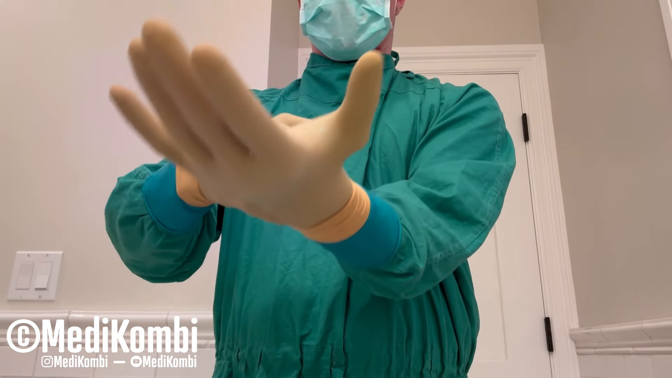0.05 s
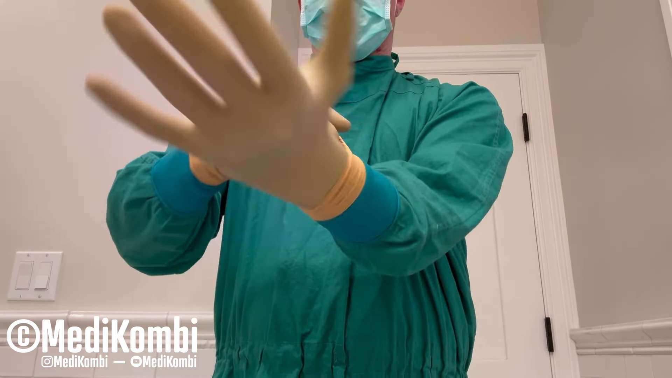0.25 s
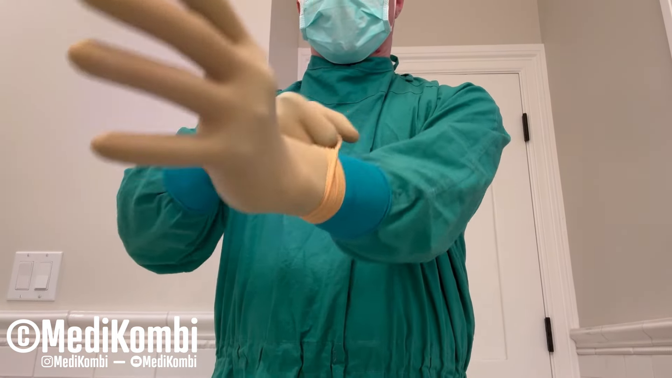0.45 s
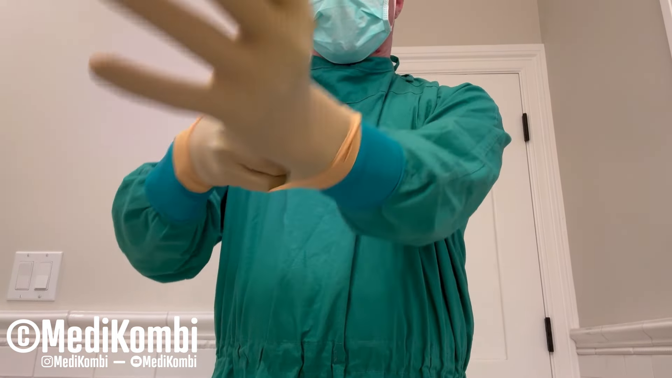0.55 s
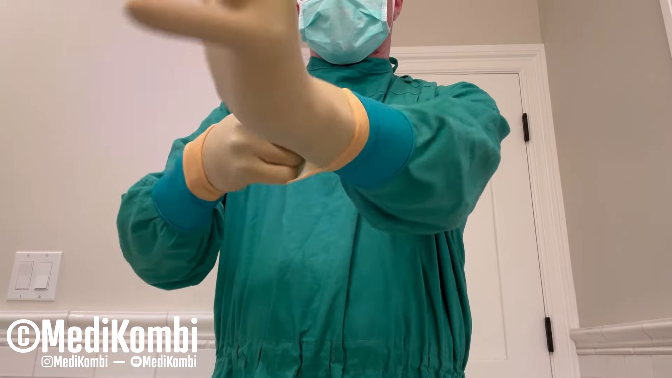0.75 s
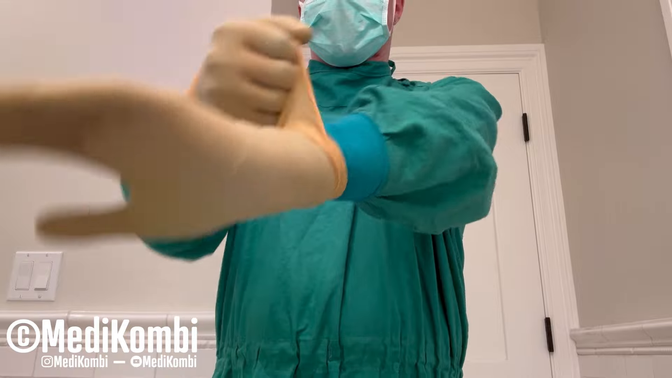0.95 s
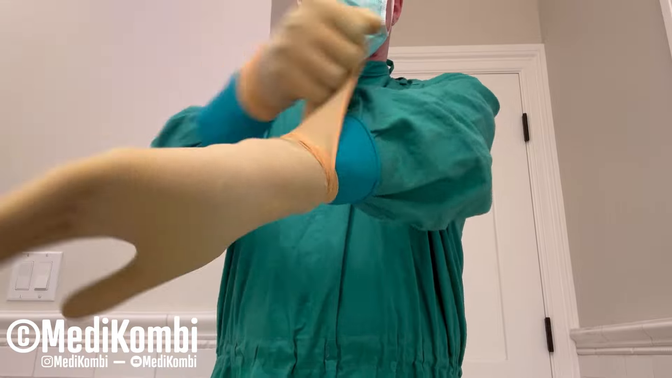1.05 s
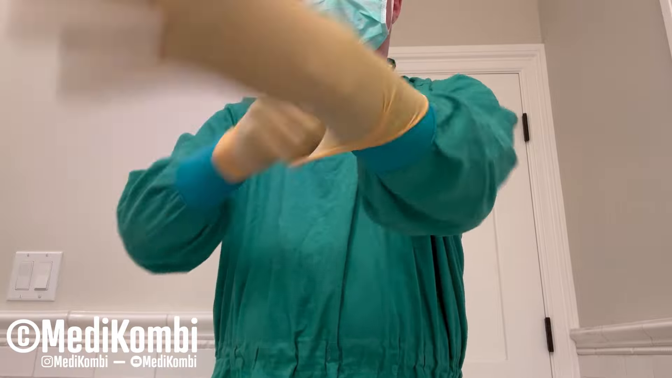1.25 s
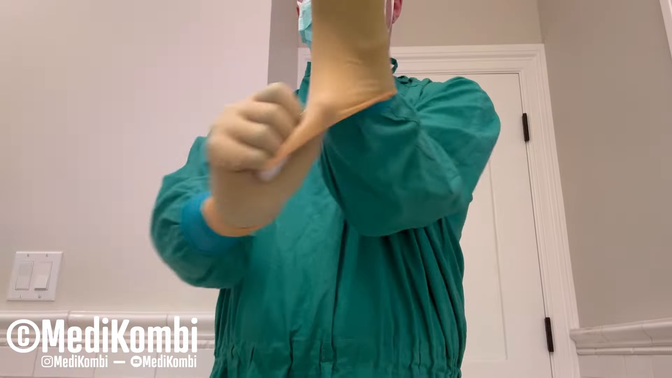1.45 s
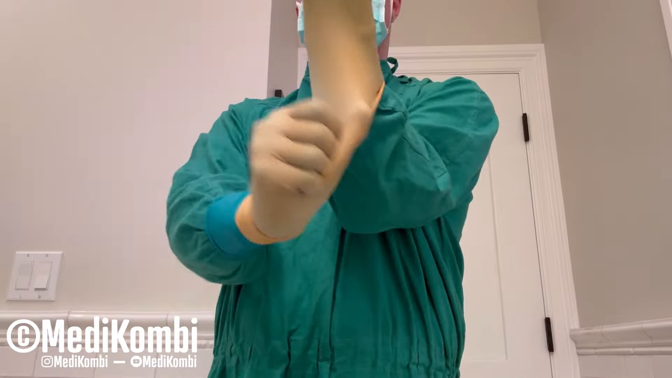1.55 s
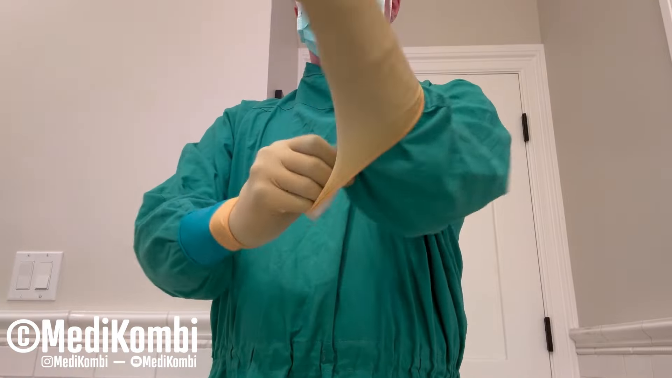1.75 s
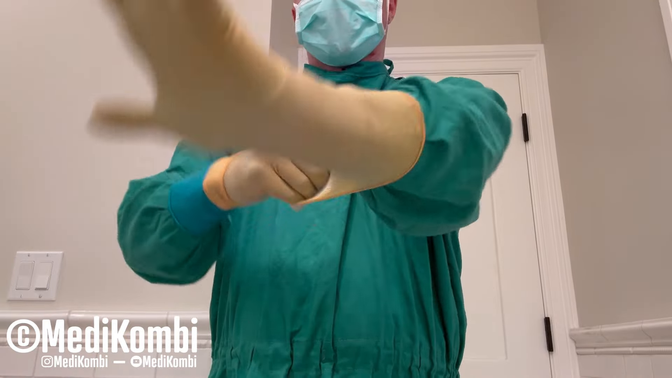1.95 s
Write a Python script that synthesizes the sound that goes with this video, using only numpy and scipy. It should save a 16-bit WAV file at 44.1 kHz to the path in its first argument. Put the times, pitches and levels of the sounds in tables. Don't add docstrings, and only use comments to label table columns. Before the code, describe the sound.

Thick rubber gloves tugged close to the microphone in a small hard room: sharp snaps, a loud ringing cuff slap early, quieter crinkles and rubbing, then wobbly pops and a tight burst of bright snaps, fading to faint ticks.

```python
import sys
import numpy as np
from scipy import signal
from scipy.fft import rfft, irfft
from scipy.io import wavfile
from scipy.ndimage import uniform_filter1d, minimum_filter1d

SR = 44100
rng = np.random.default_rng(int(sys.argv[2]) if len(sys.argv) > 2 else 0)


def waveform_to_disk(signal):
    frames = np.transpose(np.atleast_2d(signal))
    scaled = np.clip(frames, -1, 1) * 32767
    samples = np.round(scaled).astype(np.int16)
    wavfile.write(sys.argv[1], SR, samples)


def elevation(decibels):
    levels = np.asarray(decibels, float)
    return 10 ** (levels / 20)


N = 88200


def read(table, x, log=False):
    a = np.array(table, float)
    if log:
        return np.interp(np.log(x + 1), np.log(a[:, 0] + 1), a[:, 1])
    return np.interp(x, a[:, 0], a[:, 1])


def unit(x):
    return x / np.sqrt(np.mean(x ** 2))


def peak(x, db):
    return x * elevation(db) / abs(x).max()


def freqs(x):
    return np.fft.rfftfreq(x.shape[-1], 1 / SR)


def colour(x, table):
    return irfft(rfft(x) * elevation(read(table, freqs(x), log=True)), x.shape[-1])


def band(x, hz, width_hz):
    return irfft(rfft(x) * np.exp(-2 * ((freqs(x) - hz) / width_hz) ** 2), x.shape[-1])


def walk(rate_per_s):
    k = int(SR / rate_per_s)
    return unit(uniform_filter1d(uniform_filter1d(rng.standard_normal(N), k), k))


def add(out, x, at_s):
    i = int(at_s * SR) - len(x) // 2 + np.arange(len(x))
    keep = (i >= 0) & (i < N)
    out[i[keep]] += x[keep]


BURST_MS = np.arange(-1024, 1024) / SR * 1000
EVENNESS = 0.85


def burst(ms):
    envelope = np.exp(-np.where(BURST_MS < 0, 2.5, 1.2) * abs(BURST_MS) / ms)
    spec = rfft(rng.standard_normal(len(BURST_MS)) * envelope)
    return irfft(spec / abs(spec) ** EVENNESS) * np.exp(-(BURST_MS / (5 * ms)) ** 2)


def wobble(hz, cycles, turn, size=4096):
    t = np.arange(-size, size) / SR * hz
    envelope = np.exp(-np.where(t < 0, 9., 3.) * (t / cycles) ** 2)
    return envelope * np.cos(2 * np.pi * (t + turn))


CRACK_HZ, CRACK_WIDTH_HZ, CRACK_OCTAVES_PER_DB = 5150, 4820, 0.035
BODY_HZ, BODY_WIDTH_HZ = 1400, 1300
AIR_HZ, AIR_WIDTH_HZ = 13000, 4300


def snap_voice(x, db, body_db, air_db):
    crack_hz = CRACK_HZ * 2 ** (CRACK_OCTAVES_PER_DB * air_db)
    crack = peak(band(x, crack_hz, CRACK_WIDTH_HZ), db)
    body = peak(band(x, BODY_HZ, BODY_WIDTH_HZ), db + body_db)
    air = peak(band(x, AIR_HZ, AIR_WIDTH_HZ), db + air_db)
    return crack + body + air


SNAP_MS, SNAP_LAG_S, SNAP_ROOM_TOP_DB = 0.38, 0.0011, -8
PEEL_MS, PEEL_DB = 1.4, -17
# start_s, peak_db, body_db, air_db, room_db (last three relative)
SNAP_EVENTS = [(0.0024, -31.5, -12.5, 3, -7.5), (0.164, -32, -15, 0.5, -8), (0.1896, -26, -8.5, 2, -7),
               (0.4985, -43, -3, -13, 3), (0.5274, -39.5, -10, -14, 4), (0.5943, -44, -10, 0, -10),
               (0.7516, -51, -29, 1, -19), (0.783, -48, -29, -2, -45), (0.823, -46.5, -24, -8.5, -12),
               (0.986, -48, -26, 10, -9), (0.8715, -33.5, -22, -5, 10), (0.8961, -32, -20, -10, -3),
               (0.9225, -34, -31, 6.5, -14), (1.0031, -32, -7.5, 6, -6.5), (1.2001, -31.5, -6.5, 5, -2),
               (1.2945, -18.5, -44, 4, -16), (1.317, -13.5, -48, -3.5, -14.5), (1.3265, -33, -15, -7, -26),
               (1.3445, -19, -52, 0.5, -19), (1.3957, -17, -21, 2.5, -18), (1.551, -47, -3, 5, -18),
               (1.664, -37.5, -6, -1.5, -8), (1.698, -39, -3, -8, 0), (1.8659, -50.5, -7, 6.5, -6),
               (1.901, -51, -16, 19.5, -18), (1.9384, -50.5, 2, 3, -6), (1.9599, -52, -5, -8, -16)]


def snaps():
    dry, wet = np.zeros(N), np.zeros(N)
    for start_s, db, body_db, air_db, room_db in SNAP_EVENTS:
        click = peak(burst(SNAP_MS), 0)
        decay = np.exp(-abs(BURST_MS) / PEEL_MS) * (BURST_MS > 0)
        peel = elevation(PEEL_DB) * rng.standard_normal(len(BURST_MS)) * decay
        at_s = start_s + SNAP_LAG_S
        add(dry, snap_voice(click + peel, db, body_db, air_db), at_s)
        send = elevation(min(room_db, SNAP_ROOM_TOP_DB))
        add(wet, snap_voice(click, db, body_db, air_db) * send, at_s)
    return dry, wet


SLAP_S, SLAP_DB, SLAP_MS = 0.2226, -6.5, 1.06
SLAP_DIP_HZ, SLAP_DIP_WIDTH_HZ, SLAP_DIP = 3850, 450, 0.6
SLAP_BODY_DB, SLAP_BODY_HZ, SLAP_BODY_CYCLES, SLAP_BODY_LAG_S = -25, 926, 1.98, 0.0008
SLAP_ECHO_S, SLAP_ECHO_DB = 0.0037, -7
# freq_hz, gain_db
SLAP_SPECTRUM = [(300, -39), (720, -4.5), (1350, -5), (2600, -16.5), (3100, -3), (4400, 3), (6000, -9.5),
                 (16000, -16.5)]


def slap():
    out = np.zeros(N)
    flat = irfft(np.exp(1j * np.angle(rfft(burst(SLAP_MS)))))
    crack = colour(flat, SLAP_SPECTRUM)
    crack = crack - SLAP_DIP * band(crack, SLAP_DIP_HZ, SLAP_DIP_WIDTH_HZ)
    add(out, peak(crack * np.hanning(len(crack)) ** 4, SLAP_DB), SLAP_S)
    echo = elevation(SLAP_ECHO_DB) * np.roll(out, int(SLAP_ECHO_S * SR))
    body = elevation(SLAP_BODY_DB) * wobble(SLAP_BODY_HZ, SLAP_BODY_CYCLES, 0.22)
    add(out, body, SLAP_S + SLAP_BODY_LAG_S)
    return out, echo


REBOUND_S, REBOUND_DB, REBOUND_OCTAVES = 0.02, -13, 0.4
# start_s, peak_db, pitch_hz, length_cycles
CUFF_POPS = [(0.098, -46, 1330, 1.6), (0.528, -41, 465, 2.2), (0.546, -55, 430, 7.1),
             (0.587, -57, 554, 1.3), (0.638, -52.5, 468, 6.2), (0.904, -49, 432, 6.6),
             (0.948, -55.5, 404, 7.9), (1.014, -47, 575, 2.8), (1.048, -63, 146, 0.86),
             (1.121, -52.5, 547, 7.3), (1.14, -40.5, 438, 4.5), (1.1776, -30, 414, 2.1),
             (1.2, -33.5, 483, 2.06), (1.275, -41.5, 184, 3.8), (1.311, -42, 203, 3.8),
             (1.342, -42, 410, 4.5), (1.378, -44, 306, 9.4), (1.399, -33.5, 326, 2.13),
             (1.547, -39.5, 1170, 1.4), (1.579, -55, 307, 5.5), (1.661, -40.5, 660, 3.4),
             (1.744, -48, 1230, 7.3), (1.937, -48, 1440, 2.1)]
# start_s, peak_db, pitch_hz, length_cycles
SLEEVE_THUMPS = [
    (0.879, -59, 73, 2.2),
    (0.953, -61, 100.4, 2.4),
    (1.049, -49.5, 150, 1.05),
    (1.271, -42.5, 70, 2.15),
    (1.331, -56, 71.6, 2.4),
    (1.39, -44, 125, 1.3),
    (1.674, -55, 119, 2),
]
# start_s, peak_db, pitch_hz, length_cycles
MORE_CUFF_POPS = [(0.227, -46, 423, 12.4), (0.428, -58, 520, 9.1), (.544, -42, 1030, 2),
                  (.56, -45, 823, 1.8), (.598, -48, 670, 3.2), (1.136, -38.5, 1060, 1.9),
                  (1.135, -42, 1800, 4.9), (1.174, -36, 427, 1.8), (1.182, -35.5, 283, 2.3),
                  (1.192, -36, 407, 0.91), (1.207, -41, 560, 4.7), (1.225, -44.5, 505, 7.4),
                  (1.242, -48, 474, 3.5), (1.41, -43.5, 356, 2.9), (1.437, -66, 298, 1.1),
                  (1.661, -42, 1310, 4), (1.698, -40.5, 2020, 5), (1.699, -45, 990, 1.2),
                  (1.712, -38, 1520, 1.8)]


def pops():
    out = np.zeros(N)
    rows = CUFF_POPS + SLEEVE_THUMPS + MORE_CUFF_POPS
    for (start_s, db, hz, cycles), chance in zip(rows, rng.random((len(rows), 10))):
        cycles = max(cycles, 0.8)
        add(out, elevation(db) * wobble(hz, cycles, chance[0]), start_s + 0.003784)
        for late, pitch, turn in chance[1:].reshape(3, 3):
            other_hz = hz * 2 ** (REBOUND_OCTAVES * (2 * pitch - 1))
            rebound = elevation(db + REBOUND_DB) * wobble(other_hz, cycles, turn)
            add(out, rebound, start_s + 0.00401 + (late - 0.3) * REBOUND_S)
    return out


SLIDE_PER_S, SLIDE_SCATTER_DB, SLIP_CAP = 6000, 3, 3.5
SLIDE_DB, SLIDE_FLICKER_DB, SLIDE_FLICKER_PER_S = -2.5, 2.5, 29.3
# time_s, level_db
SLIDE_LEVEL = [(0, -59.5), (.08, -66), (.16, -64), (.3, -55), (.46, -65.5), (.56, -58), (.7, -82.5),
               (.83, -62), (.89, -55.5), (1.05, -57.5), (1.15, -48.5), (1.27, -59.5), (1.33, -45.5),
               (1.45, -64.5), (1.62, -65), (1.7, -51.5), (1.85, -72.5), (2, -61)]
# freq_hz, gain_db
SLIDE_SPECTRUM = [(200, -25.5), (900, 1), (2500, 5), (4500, 2.5), (7000, 0.5), (10000, 1), (13000, 5),
                  (16000, -10)]


def slide():
    slip_now = rng.random(N) < SLIDE_PER_S / SR
    size = np.minimum(rng.exponential(size=N), SLIP_CAP)
    slips = slip_now * rng.standard_normal(N) * elevation(SLIDE_SCATTER_DB * size)
    flicker_db = SLIDE_FLICKER_DB * walk(SLIDE_FLICKER_PER_S)
    level_db = read(SLIDE_LEVEL, np.arange(N) / SR) + SLIDE_DB + flicker_db
    return unit(colour(slips, SLIDE_SPECTRUM)) * elevation(level_db)


CRINKLE_PER_S, CRINKLE_SCATTER_DB, CRINKLE_DB = 800, 2, -8.5
CRINKLE_HZ, CRINKLE_OCTAVES, CRINKLE_CYCLES = 560, 0.94, 1.44
CRINKLE_TILT_DB = 5
# time_s, level_db
CRINKLE_LEVEL = [(0, -64), (.15, -62.5), (.35, -55), (.47, -56), (.56, -46), (.66, -73), (.72, -99),
                 (.83, -69), (.9, -49.5), (1.02, -62.5), (1.1, -55), (1.21, -43.5), (1.3, -51),
                 (1.42, -43.5), (1.6, -58), (1.7, -50.5), (1.8, -73.5), (2, -71.5)]


def crinkle():
    count = 1800
    out, chance = np.zeros(N), rng.random((count, 3))
    octaves = rng.standard_normal(count) * CRINKLE_OCTAVES
    times_s = np.cumsum(-np.log(chance[:, 0])) / CRINKLE_PER_S
    for at_s, (_, size, turn), octave in zip(times_s[times_s < N / SR], chance, octaves):
        db = CRINKLE_TILT_DB * octave - CRINKLE_SCATTER_DB * np.log(size)
        add(out, elevation(db) * wobble(CRINKLE_HZ * 2 ** octave, CRINKLE_CYCLES, turn, size=1024), at_s)
    return unit(out) * elevation(read(CRINKLE_LEVEL, np.arange(N) / SR) + CRINKLE_DB)


PAN_DB = -4.5


def ports(x, lead_ms):
    lead = np.exp(2j * np.pi * freqs(x) * lead_ms / 1000)
    right = irfft(rfft(x) * lead, N)
    return np.array([x * elevation(PAN_DB / 2), right * elevation(-PAN_DB / 2)])


ROOM_GAP_MS, ROOM_FILL_MS = 0.85, 6
# freq_hz, t60_s
ROOM_DECAY = [(150, 0.4), (500, 0.48), (1000, 0.46), (2000, 0.26), (4000, 0.54), (9000, 0.36),
              (15000, 0.24)]


def room(x):
    t = np.arange(SR) / SR
    noise = rng.standard_normal((2, SR))
    tail = np.zeros((2, SR))
    for hz in 60 * 2 ** np.arange(0, 8.3, 1 / 3):
        t60_s = read(ROOM_DECAY, hz, log=True)
        tail += band(noise, hz, hz / 2.4) * elevation(-60 * t / t60_s)
    tail *= np.clip((t * 1000 - ROOM_GAP_MS) / ROOM_FILL_MS, 0, 1) ** 0.5
    tail *= 3 / np.sqrt(np.sum(tail ** 2))
    return signal.fftconvolve(x[None], tail, axes=1)[:, :N]


HUM_DB, HUM_WIDTH = -64, 0.43
HUM_FLICKER_DB, HUM_FLICKER_PER_S = 2.5, 8
DRONE_HZ, DRONE_WIDTH_HZ, DRONE_DB = 125.3, 15, -76.5
# freq_hz, level_db_per_hz
HUM_SPECTRUM = [(25, 5), (70, 10), (125, -11.5), (250, -9), (700, -21), (3000, -14.5), (8000, -21),
                (16000, -14)]


def flickering_air():
    return colour(rng.standard_normal(N), HUM_SPECTRUM) * elevation(HUM_FLICKER_DB * walk(HUM_FLICKER_PER_S))


def hum():
    mid, side = flickering_air(), HUM_WIDTH * flickering_air()
    drone = unit(band(rng.standard_normal(N), DRONE_HZ, DRONE_WIDTH_HZ)) * elevation(DRONE_DB)
    return unit(np.array([mid + side, mid - side])) * elevation(HUM_DB) + drone


RIGHT_LEAD_MS, SLAP_LEAD_MS = 0.12, 0.044
SLAP_ROOM_DB, POP_ROOM_DB, RUB_ROOM_DB = -5.5, -16, -6
RUB_WIDTH = 0.78


def scene():
    crack, crack_feed = snaps()
    hit, echo = slap()
    cuff = pops()
    rub = slide() + crinkle()
    wide_rub = RUB_WIDTH * slide()
    near = ports(crack + cuff + rub, RIGHT_LEAD_MS) + ports(hit + echo, SLAP_LEAD_MS)
    near += np.array([wide_rub, -wide_rub])
    feed = crack_feed + elevation(SLAP_ROOM_DB) * hit + elevation(POP_ROOM_DB) * cuff + elevation(RUB_ROOM_DB) * rub
    return near + room(feed) + hum()


SQUEEZE_DB, SQUEEZE_SCATTER_DB, SQUEEZE_FROM_HZ = 4.5, 2.5, 8200
CLICK_CREST_DB, CALM_TOP_HZ = 17.5, 15900


def squeeze(x):
    ms = np.array([x[0] + x[1], x[0] - x[1]]) / 2
    f, t, z = signal.stft(ms, SR, nperseg=1024)
    power = abs(z[:, :512]).reshape(2, 64, 8, -1) ** 2
    lead_db = 10 * np.log10(power[0].sum(axis=1) / power[1].sum(axis=1))
    lead_db = lead_db + SQUEEZE_SCATTER_DB * rng.standard_normal(len(t))
    top = abs(np.diff(x[0], 2))
    top_peak = -minimum_filter1d(-top, size=768)
    crest = top_peak / np.sqrt(uniform_filter1d(top ** 2, size=768) + 1e-18)
    calm = crest[np.clip((t * SR).astype(int), 0, len(top) - 1)] < elevation(CLICK_CREST_DB)
    hz = f[:512, None]
    drop = np.repeat(np.array([lead_db < -SQUEEZE_DB, lead_db > SQUEEZE_DB]), 8, axis=1)
    drop |= hz > CALM_TOP_HZ
    z[:, :512] *= ~(drop & calm & (hz > SQUEEZE_FROM_HZ))
    ms = signal.istft(z, SR, nperseg=1024)[1][:, :N]
    return np.array([ms[0] + ms[1], ms[0] - ms[1]])


def band_limit(x):
    return signal.sosfilt(signal.butter(12, 16810, fs=SR, output="sos"), x)


ONE_PORT_HZ, ONE_PORT_SLOPE_HZ, SECOND_PORT_DB = 8710, 292, -16
TREBLE_LAG_MS, IN_PHASE_HZ = 0.19, 12010
LOW_CUT_HZ, TOP_HZ = 131, 16700


def record(dry):
    f, (left, right) = freqs(dry), rfft(dry)
    share = (1 - elevation(2 * SECOND_PORT_DB)) / (1 + np.exp(-(f - ONE_PORT_HZ) / ONE_PORT_SLOPE_HZ))
    turn = 2 * np.pi * (np.minimum(f, 15300) - IN_PHASE_HZ) * TREBLE_LAG_MS / 1000
    turn = turn - 0.043 * np.sin(2 * turn)
    right = np.sqrt(share) * left * np.exp(-1j * turn) + np.sqrt(1 - share) * right
    low_cut = 1 / (1 + (LOW_CUT_HZ / (f + 1)) ** 2)
    top_cut = np.where(f < TOP_HZ, 1, elevation(-45))
    mix = squeeze(irfft(np.array([left, right]) * low_cut * top_cut, N))
    return band_limit(mix)


dry = scene()
out = record(dry)
waveform_to_disk(out)
```